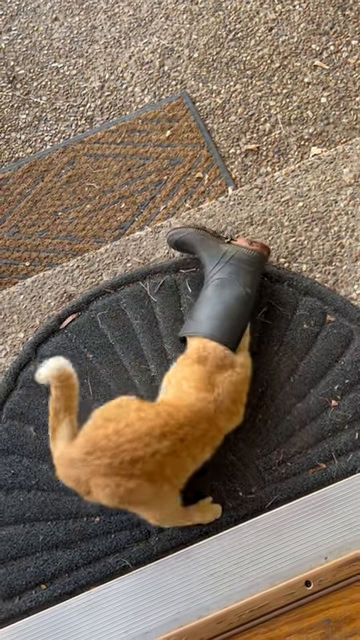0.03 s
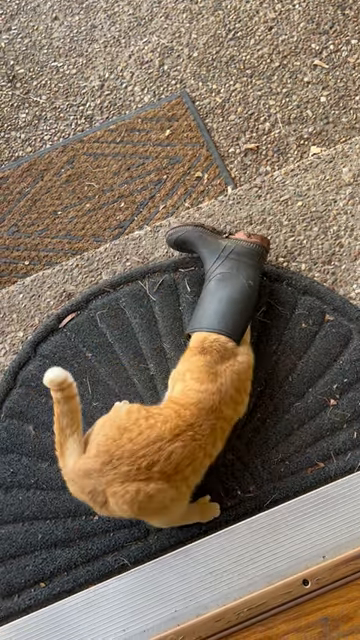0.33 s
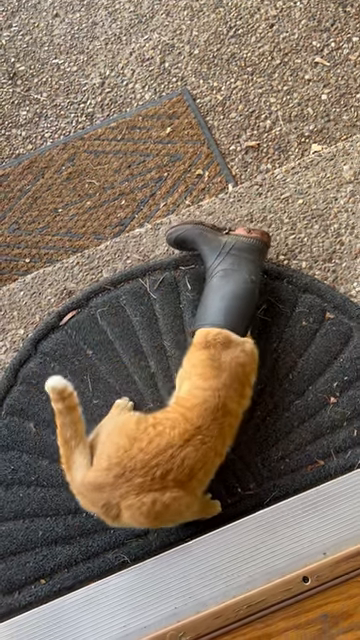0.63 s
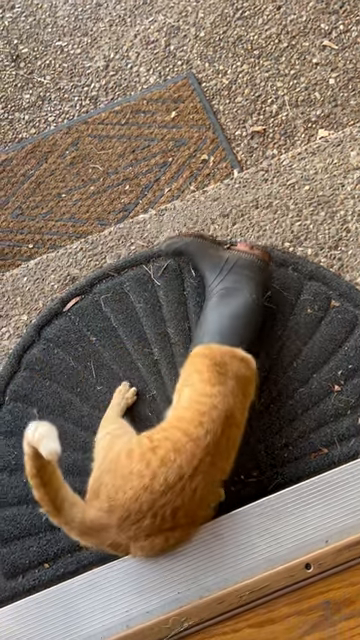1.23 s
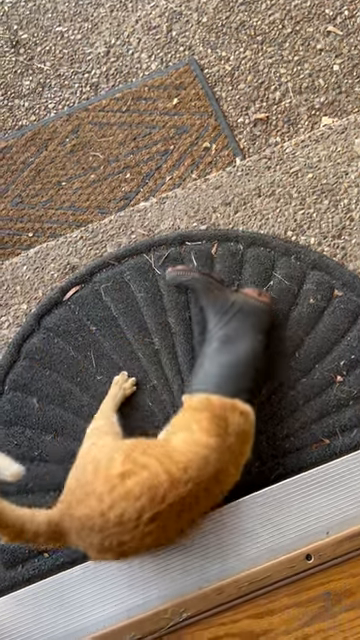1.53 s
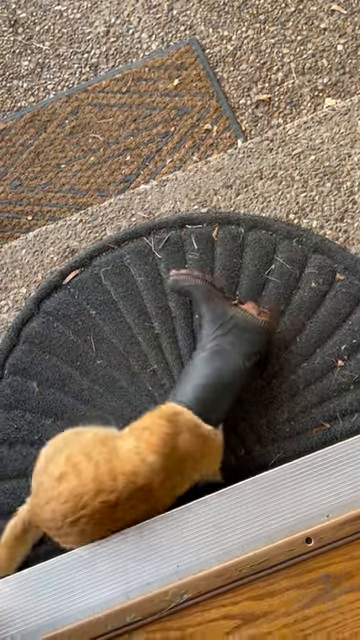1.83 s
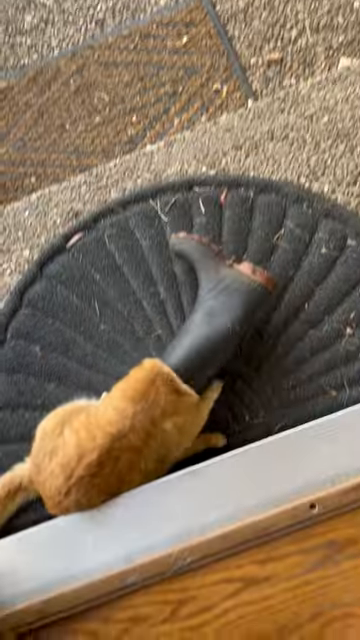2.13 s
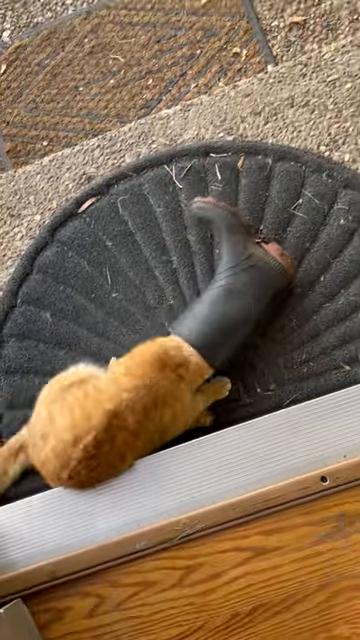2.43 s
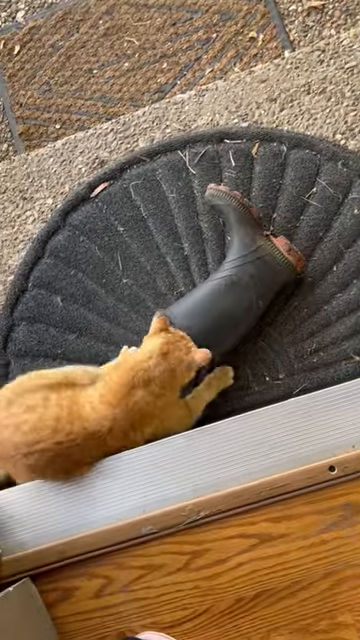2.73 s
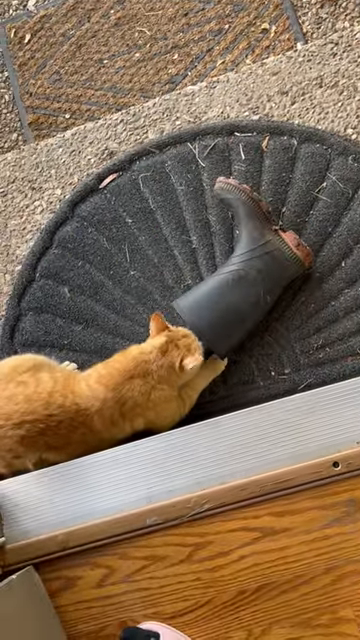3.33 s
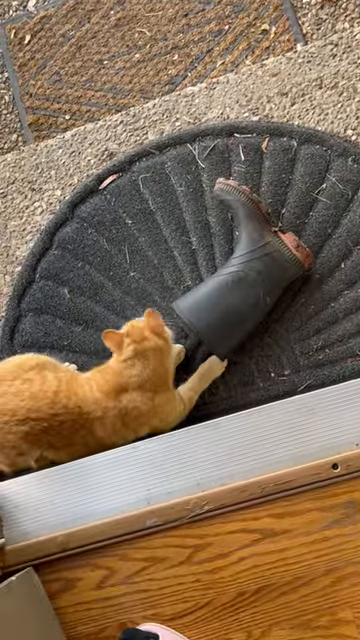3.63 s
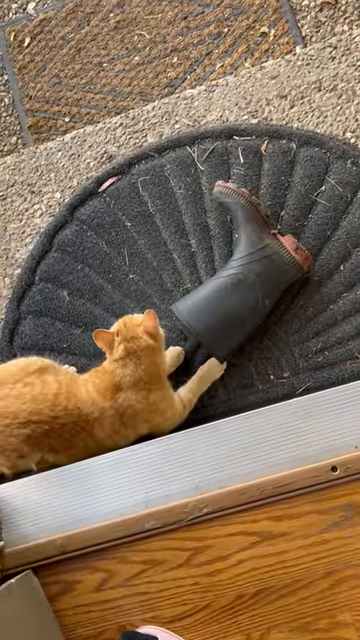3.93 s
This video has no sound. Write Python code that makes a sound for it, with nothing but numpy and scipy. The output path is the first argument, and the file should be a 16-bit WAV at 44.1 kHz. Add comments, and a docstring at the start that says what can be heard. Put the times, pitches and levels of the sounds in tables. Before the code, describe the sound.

Hollow scuffs and soft thumps of a rubber boot dragged across a mat outdoors.

```python
"""A brief scrape and a hollow knock come first, over a low outdoor rumble: a cat with its head in a
rubber boot drags it backwards over a ribbed doormat and pulls free. Mat fibres flick against the
rubber and hiss, and grit ticks and rasps. Stick-slip friction on the ribs excites the resonances of
the hollow shaft, which also thumps softly as it strikes the mat. The doorway adds short reflections."""
import sys
import numpy as np
from scipy import signal
from scipy.fft import rfft, irfft
from scipy.io import wavfile

SR = 44100
rng = np.random.default_rng(int(sys.argv[2]) if len(sys.argv) > 2 else 0)


def transcribe(signal):
    """Save signal, clipped to [-1, 1], as a 16-bit WAV file at the path in sys.argv[1]."""
    frames = np.atleast_2d(signal).T
    limited = np.clip(frames, -1, 1)
    pcm = np.round(limited * 32767).astype(np.int16)
    wavfile.write(sys.argv[1], SR, pcm)


N = 176400
T, HZ = np.arange(N) / SR, np.fft.rfftfreq(N, 1 / SR)


def amp(db):
    """Amplitude ratio of a level in decibels."""
    return 10 ** (np.asarray(db) / 20)


def unit(x):
    """Normalisation to rms 1."""
    return x / np.sqrt(np.mean(x ** 2) + 1e-20)


def read(points, hz=HZ):
    """Interpolation on a logarithmic frequency axis."""
    f, value = np.transpose(points)
    return np.interp(np.log(hz + 1), np.log(f + 1), value)


def envelope(points):
    """Amplitude envelope, interpolated in decibels."""
    return amp(np.interp(T, *np.transpose(points)))


def colour(x, response):
    """Linear filtering: the spectrum is multiplied by a frequency response."""
    return irfft(rfft(x) * response, x.shape[-1])


def band(hz, centre_hz, octaves):
    """Band-pass response, Gaussian in log frequency."""
    return np.exp(-.5 * (np.log2((hz + 1) / centre_hz) / octaves) ** 2)


def cohere(x, coherence):
    """Partial coherence: two independent signals mix as mid and side into left and right."""
    alike = read(coherence, np.fft.rfftfreq(x.shape[-1], 1 / SR))
    mid = colour(x[0], np.sqrt((1 + alike) / 2))
    side = colour(x[1], np.sqrt((1 - alike) / 2))
    return np.array([mid + side, mid - side])


def wobble(cutoff_hz):
    """Random modulation: low-pass noise of rms 1."""
    return unit(colour(rng.standard_normal(N), np.exp(-(HZ / cutoff_hz) ** 2)))


def add(mix, start_s, sound):
    """Superposition of a sound on the mix from a given time."""
    part = mix[:, max(round(start_s * SR), 0):][:, :sound.shape[-1]]
    part += sound[..., :part.shape[-1]]


# spectrum of the outdoor air (frequency [Hz], relative level [dB])
AIR_SPECTRUM = [(15, -60), (28, -68), (38, -66), (52, -45), (70, -49.5), (90, -46.5), (105, -50),
                (140, -51.5), (210, -60), (280, -62), (380, -66.5), (490, -70), (600, -73.5), (850, -78.5),
                (1300, -88.5), (1900, -94.5), (3000, -96.5), (4000, -101), (6300, -99), (9000, -108),
                (11000, -111), (12500, -118), (16000, -123)]
# left-right likeness of the air (frequency [Hz], coherence [0-1])
AIR_COHERENCE = [(60, 1), (125, 1), (250, 0.98), (500, 0.76), (1000, 0.17), (2400, 0.52), (10000, 0.55)]
# narrow bands in the rumble (centre [Hz], half-width [Hz], level [dB])
DRONE_BANDS = [(60.5, 3.9, -57.5), (76.1, 5.4, -49)]
# slow swell of the rumble (time [s], gain [dB])
RUMBLE_SWELL = [(0, 0.5), (1.4, 1.5), (2.5, 0.5), (3.2, -1), (4, 0)]
def rumble(air_db=-41.5):
    """Ambient noise: a broadband rumble and faint hiss, with narrow bands heard as a wavering drone."""
    noise = cohere(rng.standard_normal((2, N)), AIR_COHERENCE)
    air = amp(air_db) * unit(colour(noise, amp(read(AIR_SPECTRUM))))
    drone = sum(amp(db) * unit(colour(rng.standard_normal(N), np.exp(-((HZ - hz) / width) ** 2)))
                for hz, width, db in DRONE_BANDS)
    return (air + drone) * envelope(RUMBLE_SWELL)


# reflections from the sill, door and frame (delay [s], gain [dB])
DOOR_ECHOES = [(.0031, -24.5), (.0073, -20), (0.0114, -14), (0.0188, -18)]
def doorway(direct, scatter_db=-13, t60_s=.058):
    """Early reflections: convolution with discrete echoes and a decaying scatter from door and step."""
    t = np.arange(12000) / SR
    taps = rng.standard_normal((2, t.size)) * (rng.random((2, t.size)) < .08)
    taps *= (t > .003) * amp(-60 * t / t60_s)
    taps *= amp(scatter_db) / np.linalg.norm(taps[0])
    for delay_s, db in DOOR_ECHOES:
        add(taps, delay_s, amp([db]))
    return signal.fftconvolve(direct, taps, axes=1)[:, :N]


# left-right likeness of the contact sounds (frequency [Hz], coherence [0-1])
CONTACT_COHERENCE = [(200, 1), (600, 0.94), (2000, 1), (5000, 0.61), (8000, 0.9), (12000, 0.92)]
def clicks(per_s, spread_db):
    """Shot noise: impulses of uneven size at random times, partly coherent between left and right."""
    sizes = amp(spread_db * np.minimum(rng.exponential(1, N), 4))
    occurs = rng.random(N) < per_s / SR
    return cohere(unit(sizes * occurs * rng.standard_normal((2, N))), CONTACT_COHERENCE)


# spectrum of the flicking mat fibres (frequency [Hz], relative level [dB])
FIBRE_SPECTRUM = [(300, -11), (1000, 2), (2300, 0.5), (3000, -0.5), (4000, 2.5), (5200, -1), (7000, 1),
                  (9000, -2), (10800, -4), (12200, -20), (15500, -25)]
def fibre_noise():
    """Superposed transients: thousands of fibres a second flick off the rubber and merge into hiss."""
    return colour(clicks(per_s=14000, spread_db=.5), amp(read(FIBRE_SPECTRUM)))


# hiss of the mat under the boot (time [s], level [dB])
BRUSH_LEVEL = [(0, -52.5), (.035, -73), (.09, -64.5), (.16, -74), (.27, -69.5), (.7, -70), (.95, -73),
               (1.09, -69), (1.13, -53.5), (1.19, -57.5), (1.31, -58.5), (1.345, -61.5), (1.45, -61.5),
               (1.55, -55), (1.62, -53.5), (1.7, -58), (1.79, -67.5), (1.88, -63), (1.98, -72),
               (2.14, -68.5), (2.42, -69.5), (2.56, -64.5), (2.69, -64), (2.78, -69.5), (2.95, -71),
               (3.2, -72.5), (3.5, -76.5), (4, -77.5)]
CATCH_HZ = 45.4  # bandwidth of the level flutter in hiss and scrape
def brushing(dull_hz=7750, bright_above_db=-69.5, fizz_hz=12300, fizz_from_db=-53):
    """Friction noise: the fibre hiss grows louder and brighter when the boot slides fast."""
    bright = unit(fibre_noise())
    dull = colour(bright, 1 / np.sqrt(1 + (HZ / dull_hz) ** 8))
    db = np.interp(T, *np.transpose(BRUSH_LEVEL))
    brightness = 1 / (.5 + np.exp((bright_above_db - db) / 4))
    # the hardest strokes add a top fizz, which grows faster than the hiss
    fizz = colour(bright, HZ > fizz_hz) * amp(2 + 2.6 * (db - fizz_from_db))
    hiss = brightness * bright + (1 - brightness) * dull + fizz
    return hiss * amp(db + 1.5 + .97 * wobble(CATCH_HZ))


def grit(relative_db=-15):
    """Sparse shot noise: loose grit crackles under the moving boot, following the level of the hiss."""
    response = amp(read(FIBRE_SPECTRUM)) * band(HZ, 2870, octaves=1.1)
    specks = colour(clicks(per_s=160, spread_db=1.5), response)
    return amp(relative_db) * unit(specks) * envelope(BRUSH_LEVEL)


def strokes(rows, friction, octaves):
    """Amplitude modulation: each stroke is one band of friction noise under a Gaussian envelope."""
    out = np.zeros((2, N))
    for peak_s, width_s, db, hz in rows:
        swell = amp(db) * np.exp(-.5 * ((T - peak_s) / width_s) ** 2)
        out += unit(colour(friction, band(HZ, hz, octaves))) * swell
    return out


# quick strokes of fur and paws (peak time [s], half-width [s], level [dB], band centre [Hz])
FUR_SWISHES = [(.034, 0.0067, -52, 8750), (.039, 0.0025, -55.5, 3170), (.445, .0095, -68, 7000),
               (.525, .012, -68, 7000), (.666, 0.0059, -66, 4700), (1.138, 0.01, -69, 4470),
               (2.988, 0.0044, -65, 7000), (3.085, 0.016, -65, 9600)]
def swishes():
    """Sliding friction: fur and paws sweep the rubber in brief swells of hiss."""
    return strokes(FUR_SWISHES, fibre_noise(), octaves=.57)


IMPACT_T, IMPACT_HZ = np.arange(8192) / SR, np.fft.rfftfreq(8192, 1 / SR)
LEAD_S = 512 / SR  # room for the filter's spread ahead of a burst
def crunch(response, decay_s=.0012):
    """Transient friction: a filtered noise burst with exponential decay and peak 1."""
    burst = rng.standard_normal((2, IMPACT_T.size)) * np.exp(-IMPACT_T / decay_s)
    burst = np.roll(burst, round(LEAD_S * SR), axis=1)
    sound = colour(cohere(burst, CONTACT_COHERENCE), response)
    return sound / abs(sound).max()


# ticks of grit and claws (time [s], peak level [dB], band centre [Hz])
GRIT_TICKS = [(0.0743, -35, 7650), (.304, -45, 3500), (.612, -49.5, 5000), (0.6531, -38, 5450),
              (.658, -55, 4200), (0.695, -50, 8000), (0.848, -47, 4500), (1.118, -43, 2200),
              (1.1282, -40, 4500), (1.138, -39, 3600), (1.169, -45, 3000), (1.305, -39.5, 2000),
              (1.3235, -43, 2200), (1.58, -38, 2200), (1.6105, -39, 5000), (1.649, -38, 4000),
              (2.1045, -48, 6000), (3.05, -54, 9000)]
def ticks(floor_db=-13):
    """Hard impacts: the brief contact of grit or a claw gives a dry, broadband tick."""
    out = np.zeros((2, N))
    spectrum = amp(np.maximum(read(FIBRE_SPECTRUM, IMPACT_HZ), floor_db))
    for time_s, db, hz in GRIT_TICKS:
        add(out, time_s - LEAD_S, amp(db) * crunch(spectrum * band(IMPACT_HZ, hz, octaves=1.1)))
    return out


# resonances of the hollow shaft (frequency [Hz], bandwidth [Hz], relative level [dB])
SHAFT_MODES = [(400, 60, 1), (570, 71, 3.5), (733, 55, 2), (861, 37, -2.5), (1180, 100, -13.5),
               (1840, 86, -30), (2480, 410, -23.5), (3640, 90, -8)]
def shaft_response(hz, damping_hz=4200):
    """Modal superposition: damped resonances add, and the rubber absorbs the treble."""
    modes = sum(amp(db) / (1 + 2j * (hz - mode_hz) / width) for mode_hz, width, db in SHAFT_MODES)
    return modes / (1 + (hz / damping_hz) ** 4)


# rubs on single ribs (peak time [s], half-width [s], level [dB], band centre [Hz])
RIB_RUBS = [(.805, 0.026, -56, 850), (.840, 0.014, -46.5, 660), (1.142, 0.022, -53.5, 1460),
            (1.315, 0.011, -53, 2040), (1.56, 0.09, -54.5, 910), (2.33, 0.012, -61, 1240),
            (2.592, 0.0066, -54.5, 780), (3.085, 0.019, -64, 2360), (3.7, 0.18, -77.5, 1290)]
SLIPS_PER_S, SLIP_SPREAD_DB = 3200, 3
def rubs():
    """Forced resonance: the wall slips over one rib and the shaft answers hollowly."""
    friction = colour(clicks(SLIPS_PER_S, SLIP_SPREAD_DB), shaft_response(HZ))
    return strokes(RIB_RUBS, friction, octaves=.39)


# scrape of the wall bearing on the ribs (time [s], level [dB])
SCRAPE_LEVEL = [(0, -46), (.1, -61), (.18, -72), (.43, -59.5), (.66, -65.5), (.75, -53.5), (.845, -59.5),
                (.89, -86), (1.09, -60), (1.125, -43.5), (1.19, -48), (1.235, -47), (1.275, -52),
                (1.31, -48.5), (1.338, -54), (1.4, -52), (1.59, -47.5), (1.68, -51), (1.77, -64),
                (2.02, -81), (2.15, -64.5), (2.24, -86), (2.4, -71), (2.58, -57), (2.72, -76), (3.2, -66),
                (4, -74)]
# spectrum of the rubber wall (frequency [Hz], relative level [dB])
WALL_SPECTRUM = [(30, -25), (100, -25), (200, 12), (320, 5), (490, 3), (700, -2.5), (1080, -4.5),
                 (1500, -10), (3000, -22.5), (8000, -25), (16000, -65)]
def scraping(flex_share=.024, flex_hz=10, catch_db=.5):
    """Stick-slip friction: slips on the ribs drive wall and shaft, whose resonances shift as it flexes."""
    slips = clicks(SLIPS_PER_S, SLIP_SPREAD_DB)
    wall = colour(clicks(SLIPS_PER_S, SLIP_SPREAD_DB), amp(read(WALL_SPECTRUM)))
    bend = np.clip(wobble(flex_hz), -1, 1)
    shaft = np.zeros((2, N))
    for shift in (-1, 0, 1):  # crossfade of lowered, resting and raised resonances
        weight = np.sqrt(np.maximum(1 - abs(bend - shift), 0))
        shaft += weight * colour(slips, shaft_response(HZ / (1 + shift * flex_share)))
    flutter = amp(catch_db * np.tanh(wobble(CATCH_HZ)))
    return unit(shaft + wall) * envelope(SCRAPE_LEVEL) * flutter


def rasping(per_s=310, decay_s=.002, relative_db=-12.5):
    """Intermittent friction: grit catches under the scraping rubber and lets go in uneven bursts."""
    catches = (rng.random(N) < per_s / SR) * rng.uniform(.37, 1, N)
    bursts = signal.lfilter([1], [1, -np.exp(-1 / (decay_s * SR))], catches)
    noise = cohere(rng.standard_normal((2, N)) * bursts, CONTACT_COHERENCE)
    rasp = colour(noise, band(HZ, 1900, octaves=.58))
    return amp(relative_db) * unit(rasp) * envelope(SCRAPE_LEVEL)


def ring(hz, rise_s, t60_s):
    """Damped oscillation: a gliding sine under a soft-starting, decaying envelope of peak 1."""
    swell = (1 - np.exp(-(IMPACT_T / rise_s) ** 2)) * amp(-60 * IMPACT_T / t60_s)
    return swell / swell.max() * np.sin(2 * np.pi * np.cumsum(hz) / SR)


# knocks of the boot on the mat, the last row a soft paw step (time [s], slap level [dB], slap starting pitch
# [Hz], crunch level [dB], crunch centre [Hz], thump level [dB], thump nominal pitch [Hz], thump T60 [s])
BOOT_KNOCKS = [(0.0743, -35.5, 730, -37, 2020, -30.5, 144, 0.029),
               (0.6527, -59, 890, -47, 1650, -60, 220, .04),
               (1.126, -31.5, 1195, -30.5, 2200, -36.5, 176, 0.077),
               (1.192, -39, 720, -45.5, 1790, -37, 158, 0.066),
               (1.2476, -29.5, 660, -37, 1210, -24.5, 176, .055),
               (1.3465, -45.5, 1050, -40, 2300, -61, 208, .04),
               (1.6094, -34, 720, -35, 1620, -28.5, 190, 0.049),
               (2.105, -45, 730, -47, 1400, -39.5, 232, 0.059),
               (2.123, -44, 900, -41.5, 1450, -30.5, 213, 0.05),
               (2.516, -50, 1100, -49, 2180, -45, 253, 0.029), (2.763, -49, 516, -56, 1200, -41, 297, 0.13),
               (3.139, -62, 500, -66, 1200, -34, 134, .05)]
def knocks(thump_lag_s=.0017, sag_s=.0054):
    """Impact excitation: a knock crunches the mat, slaps the wall and sets off a falling shaft thump."""
    out = np.zeros((2, N))
    slap_glide = np.exp(-14 * IMPACT_T)
    thump_glide = .82 + .72 * np.exp(-IMPACT_T / sag_s)
    for time_s, slap_db, slap_hz, crunch_db, crunch_hz, thump_db, thump_hz, t60_s in BOOT_KNOCKS:
        mat = crunch(band(IMPACT_HZ, crunch_hz, octaves=.57))
        slap = ring(slap_hz * slap_glide, rise_s=.0009, t60_s=.014)
        thump = ring(thump_hz * thump_glide, rise_s=.0033, t60_s=t60_s)
        add(out, time_s - LEAD_S, amp(crunch_db) * mat)
        add(out, time_s, amp(slap_db) * slap)
        add(out, time_s + thump_lag_s, amp(thump_db) * thump)
    return out


def scene():
    """Superposition: the direct sound of boot and mat, its reflections and the outdoor rumble."""
    direct = swishes() + rubs() + brushing() + scraping() + rasping() + knocks() + ticks() + grit()
    return direct + doorway(direct) + rumble()


# lead of the left microphone port over the right (frequency [Hz], phase [rad])
PORT_PHASE = [(3000, 0), (4600, 0.2), (6800, -1.43), (12000, -1.26)]
def record(dry, fade_s=.004, cutoff_hz=15750):
    """Phase difference: two ports hear the treble out of step; the ends fade and the band is limited."""
    fade = np.sin(np.pi / 2 * np.minimum(np.minimum(T, T[::-1]) / fade_s, 1)) ** 2
    ports = colour(dry * fade, np.exp(.5j * np.outer([1, -1], read(PORT_PHASE))))
    lowpass = signal.firwin(511, cutoff_hz, window=("kaiser", 9), fs=SR)
    return signal.oaconvolve(ports, lowpass[None], "same")


dry = scene()
out = record(dry)
transcribe(out)
```